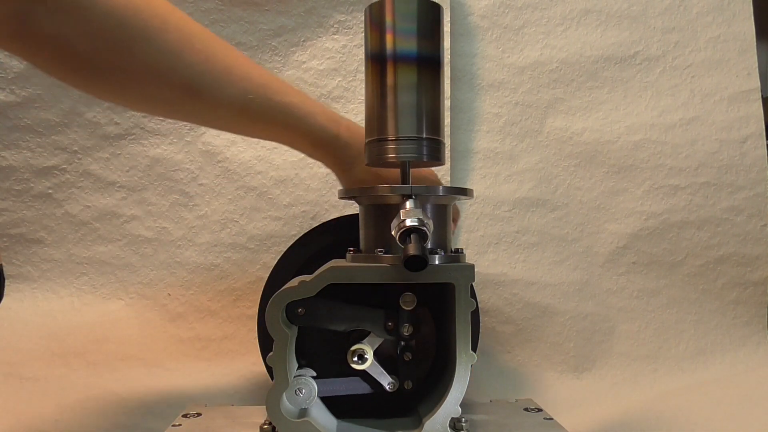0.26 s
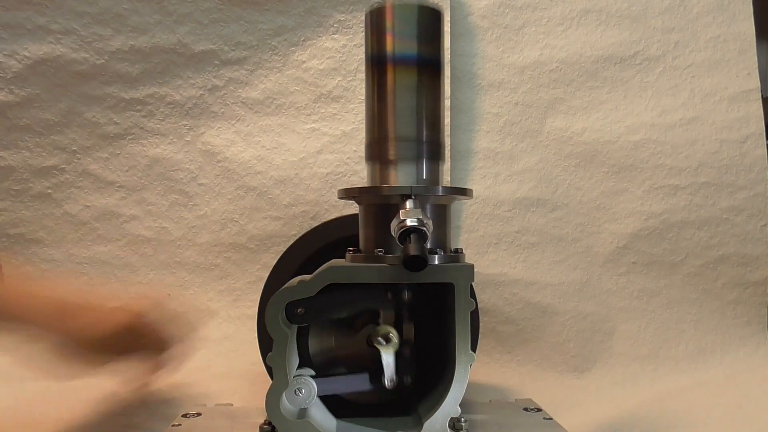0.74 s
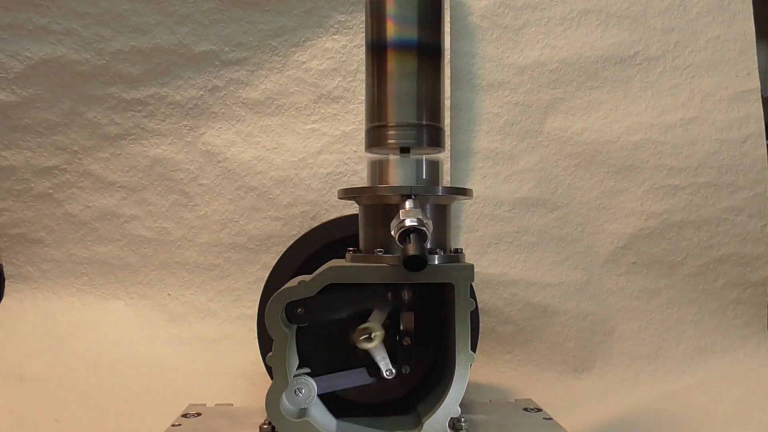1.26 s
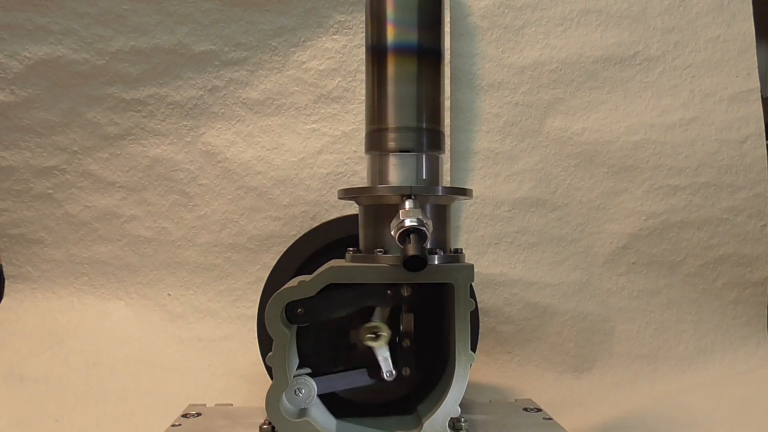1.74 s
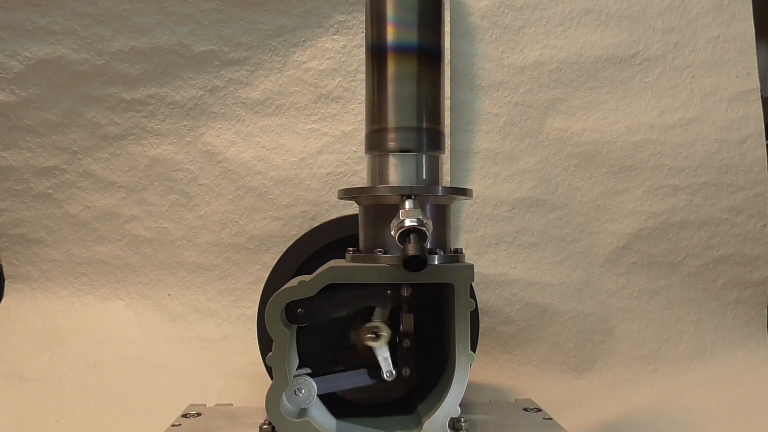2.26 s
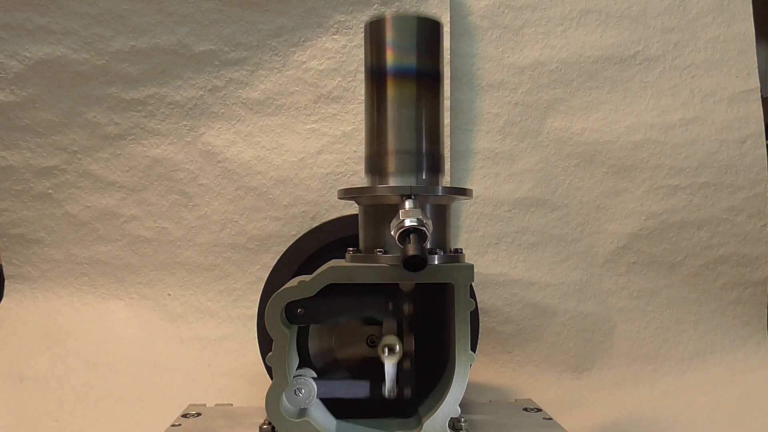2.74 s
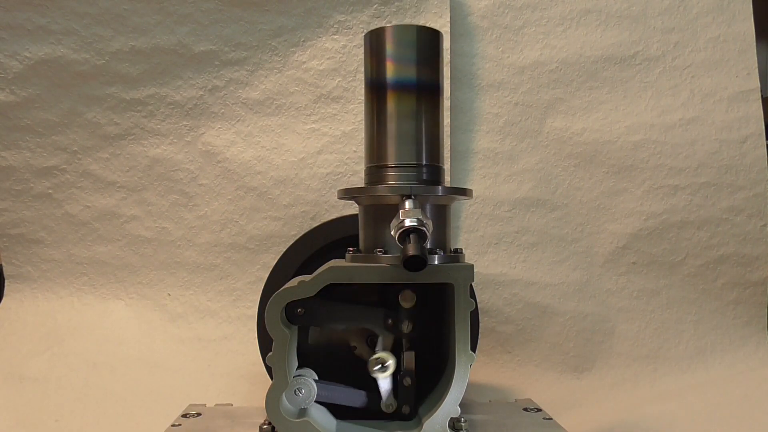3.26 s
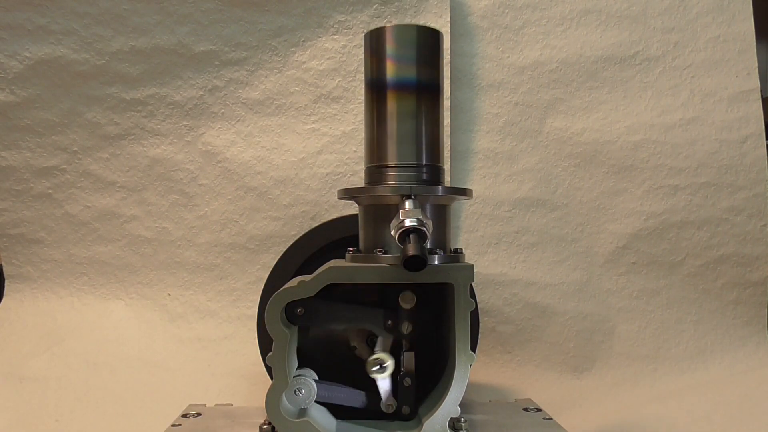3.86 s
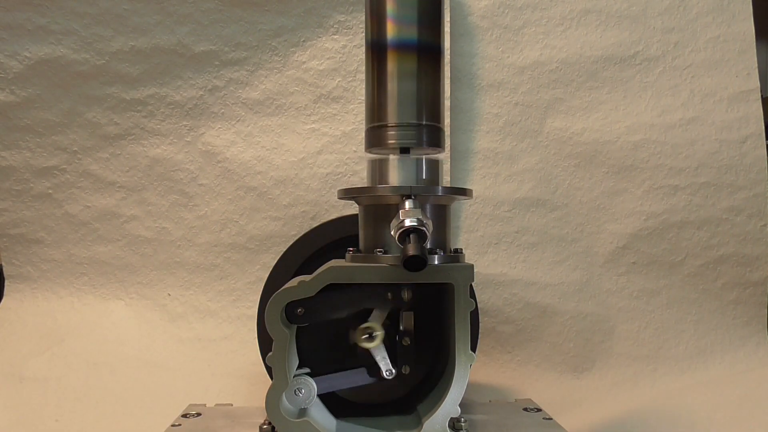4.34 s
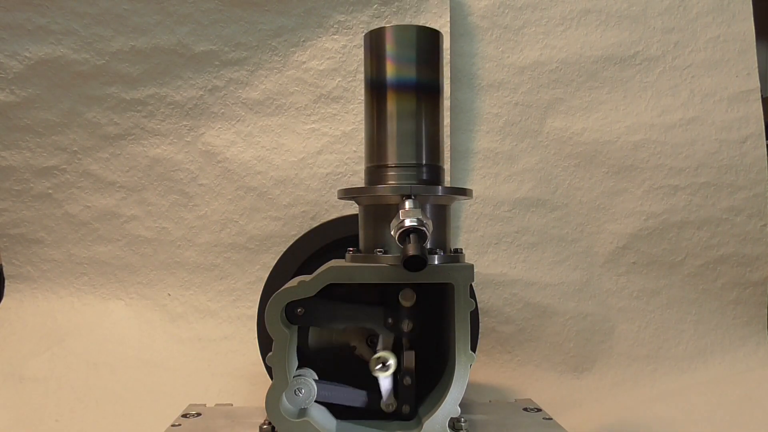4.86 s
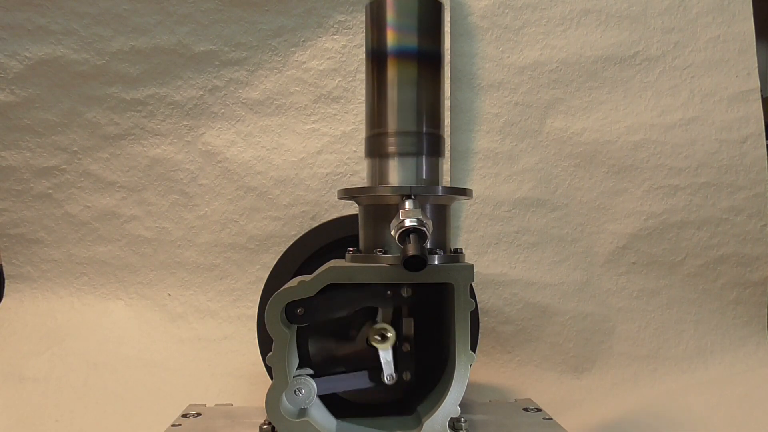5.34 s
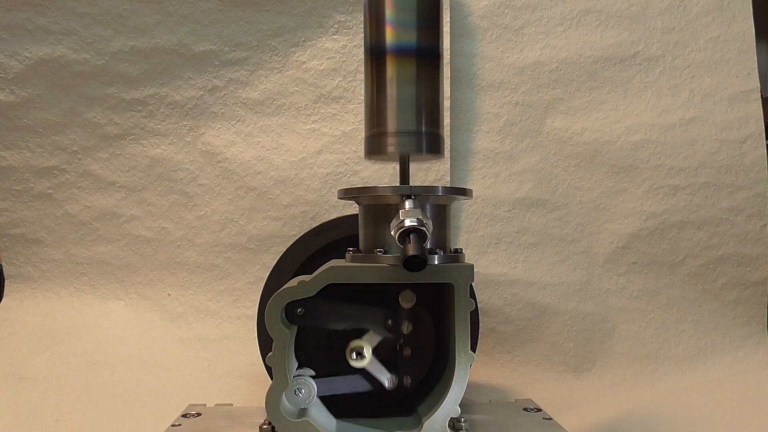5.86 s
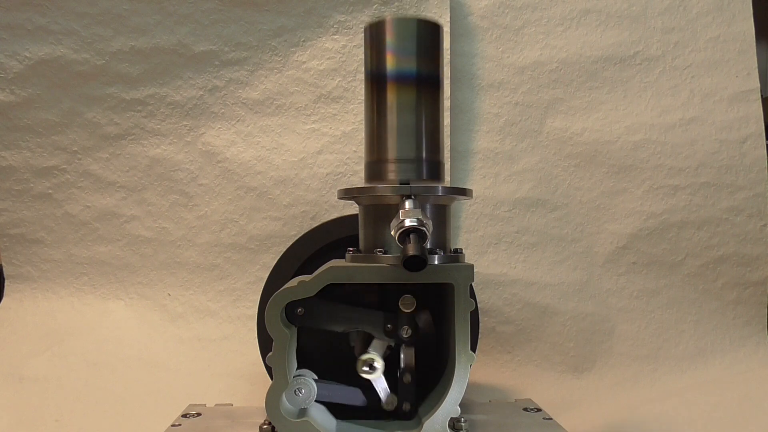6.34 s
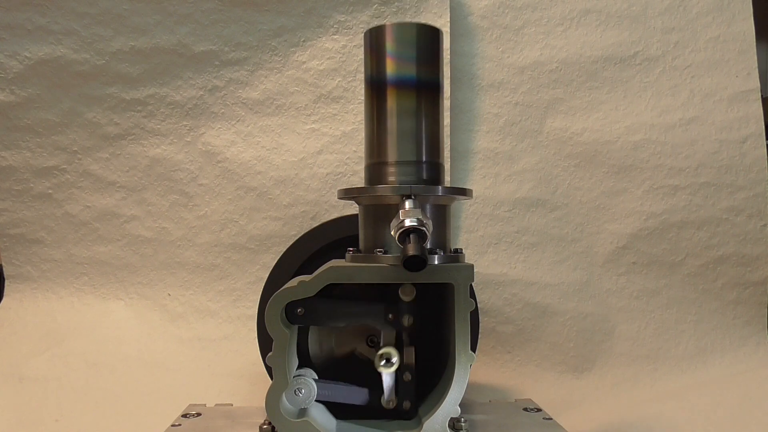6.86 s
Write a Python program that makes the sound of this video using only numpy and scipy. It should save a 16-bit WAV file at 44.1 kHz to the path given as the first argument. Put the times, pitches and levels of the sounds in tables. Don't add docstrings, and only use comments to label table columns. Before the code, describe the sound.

A dull low thump from the microphone opens the clip and drains away within 0.2 s, with a brief breath-like hiss of electronics. Until 0.7 s it is nearly quiet: soft room hiss, a thin high whine that then stops, faint fingers and flywheel murmurs. A small clack at 0.72 s precedes the flick; from 0.8 s come a hard hollow knock, a bright tick and a bump as the hand slips off, with a rush of scraping. Short, dry, woody-metallic knocks follow about every 0.24 s, loudest until 1.5 s, with link clacks near 1.4 and 1.56 s. Between them lie gritty rubbing, thin bearing singing and low bench groans. Knocks grow softer and wider apart, 0.3 s at 3.5 s and over 0.4 s near 7 s, with stray clacks around 4.4, 5.8, 6.6 and 7.06 s. A faint hum swells around 0.9 and 4.6 s. The engine is still turning when it ends.

```python
import sys
import numpy as np
from scipy import signal
from scipy.fft import rfft, irfft, next_fast_len
from scipy.io import wavfile
from scipy.ndimage import map_coordinates

SR = 44100
rng = np.random.default_rng(int(sys.argv[2]) if len(sys.argv) > 2 else 0)


def gain_from_decibels(decibels):
    exponent = np.asarray(decibels, float) / 20
    return 10 ** exponent


def pcm_store(signal):
    levels = np.round(np.clip(np.atleast_2d(signal), -1, 1) * 32767)
    wavfile.write(sys.argv[1], SR, levels.astype(np.int16).T)


N = 313551
TIME = np.arange(N) / SR
COARSE = TIME[::32]


def unit(x):
    return x / np.sqrt(np.mean(x ** 2) + 1e-20)


def filtered(x, response):
    m = next_fast_len(N + SR // 8, True)
    return irfft(rfft(x, m) * response(np.fft.rfftfreq(m, 1 / SR)), m)[:N]


def resonant(x, peaks):
    def response(f):
        total = 0
        for k, (hz, width, db) in enumerate(peaks):
            band = 1j * f * width
            total = total + (-1) ** k * gain_from_decibels(db) * band / (hz * hz - f * f + band)
        return total
    return filtered(x, response)


def resonant_noise(peaks):
    return unit(resonant(rng.standard_normal(N), peaks))


def hiss(spectrum):
    hz, db = np.transpose(spectrum)
    noise = rng.standard_normal(N)
    return unit(filtered(noise, lambda f: gain_from_decibels(np.interp(np.log(f + 1), np.log(hz + 1), db))))


def slow(rate):
    return map_coordinates(rng.standard_normal(8000), [COARSE * rate])


def wobble(rate):
    return np.interp(TIME, COARSE, slow(rate))


# t/s, peak level/dB
KNOCKS = [(0.795, -12.5), (1.028, -12), (1.267, -11.5), (1.509, -14), (1.759, -16.5), (2.014, -17.5),
          (2.275, -17), (2.543, -18), (2.817, -18.5), (3.099, -17), (3.389, -17), (3.689, -18),
          (3.996, -18.5), (4.314, -20), (4.644, -19.5), (4.988, -19), (5.346, -19.5), (5.719, -21),
          (6.112, -23), (6.526, -22.5), (6.967, -22.5)]


def turns():
    s = np.array(KNOCKS)[:, 0]
    after_last = 2 * s[-1] - s[-2]
    return np.interp(TIME, np.append(s, after_last), np.arange(len(s) + 1))


# t/s, level/dB
FRICTION = [(0, -66), (.44, -72.5), (.67, -67.5), (.79, -45), (.89, -46), (.95, -49), (1.3, -49),
            (1.9, -55), (3, -56.5), (4.4, -61.5), (6, -62), (7.11, -63)]
# slow-running level/dB, growth/(dB per dB of friction), swing/dB, loudest angle/turn
DRAG_LAYERS = [
    (-58, 0.79, 0.5, 1),
    (-67, 1.11, 3.5, .05),
    (-62.5, 1.07, 1, 0.22),
]
SLOW_DB = -62


def drag(layer):
    db, growth, swing_db, at = DRAG_LAYERS[layer]
    friction_db = np.interp(TIME, *np.transpose(FRICTION)) - SLOW_DB
    return gain_from_decibels(db + growth * friction_db + swing_db * np.cos(2 * np.pi * (turns() - at)))


# f/Hz, level/(dB per Hz)
HISS = [(18, -29), (30, -2), (81, -17), (208, -4), (237, -11), (301, -7), (713, -11), (2510, -23),
        (4120, -21), (5640, -42), (7930, -18), (12100, -36), (15700, -44)]
HISS_DB = -68
# f/Hz, rms level/dB
TONES = [
    (4037, -78),
    (8043, -79),
    (7095, -84),
]
# t/s, half length/s, level/dB
HUM = [
    (.45, 0.54, -62),
    (0.903, 0.12, -48.5),
    (4.6, 0.51, -57.5),
    (5.707, 0.19, -63),
]


def background():
    whine = sum(gain_from_decibels(db + 1.7 * wobble(25)) * np.sin(2 * np.pi * hz * TIME) for hz, db in TONES)
    whine = whine * np.clip((.72 - TIME) / 0.076, 0, 1) * np.clip(TIME / 0.44, 0, 1)
    swell = sum(gain_from_decibels(db) * np.exp(-((TIME - s) / half) ** 2) for s, half, db in HUM)
    hum = (swell + gain_from_decibels(-81.5)) * gain_from_decibels(-4 + 1.2 * wobble(4.9)) * np.sin(2 * np.pi * 237 * TIME)
    return gain_from_decibels(HISS_DB + 2) * hiss(HISS) + whine + hum


def room(x):
    t = TIME[:SR // 3]
    tail = rng.standard_normal(len(t)) * gain_from_decibels(-60 * t / 0.11) * (t > .004)
    return signal.fftconvolve(x, tail / np.linalg.norm(tail))[:N]


# f/Hz, level/(dB per Hz)
BENCH = [(18, -54), (30, -38), (81, 1.5), (119, 2.5), (163, 5), (204, 3.5), (313, 3), (368, 1), (600, 0),
         (780, -40), (1320, -120)]
# angle/turn, width/turn, level/dB
GROAN = [
    (0.33, 0.079, -44),
    (0.774, 0.08, -54),
    (0.07, 0.049, -50),
]


def bench():
    angle = turns()
    load = sum(gain_from_decibels(db) * np.exp(-.5 * ((angle % 1 - at) / width) ** 2) for at, width, db in GROAN)
    load = load * gain_from_decibels(-1.2 * TIME) * (angle > 0)
    pitch_hz = 171 + 7 * wobble(20)
    hum = load * gain_from_decibels(1.3 * wobble(9)) * np.sin(2 * np.pi * np.cumsum(pitch_hz) / SR)
    thud = 0.45 * load * resonant_noise([(92, 14, 0.82), (301.4, 14.6, -0.5)])
    rumble = drag(2) * gain_from_decibels(-1.0 + 2.2 * wobble(23)) * hiss(BENCH)
    return hum + thud + rumble


# f/Hz, width/Hz, angle/turn, half span/turn, level/dB
SINGING = [
    (5340, 81, 0.08, 0.14, -55.5),
    (9190, 120, 0.45, 0.038, -58.5),
    (5330, 150, 0.572, 0.075, -59),
    (2860, 110, 0.425, 0.087, -66),
]


def singing():
    angle, out = turns(), 0
    for hz, width, at, half, db in SINGING:
        load = np.exp(-((angle % 1 - at) / half) ** 4) * (angle > 0)
        ring = unit(resonant(gain_from_decibels(1.7 * wobble(170)) * rng.standard_normal(N), [(hz, width, 0)]))
        out = out + load * gain_from_decibels(db - 1.2 * TIME + 1.3 * wobble(3.05)) * ring
    return out


# delay/s, angle/turn, half length/s, level/dB, fade/(dB/s), case share/dB, dullness/dB
FOLLOW = [
    (.004, .01, 0.0094, -40.5, -2.36, 1.5, 3),
    (.012, .085, 0.0055, -56, 0.3, 1.5, -3.5),
    (.017, .18, .0095, -47.5, -0.58, 6.5, 3),
]
# t/s, level/dB, case share/dB
DOWN = [(1.133, -52, -6), (1.631, -54, -14), (1.891, -48, 2), (2.137, -64, -15), (2.401, -72, -21),
        (2.666, -57, -22), (2.952, -56.5, -14), (3.238, -61, -13), (3.531, -56, -5), (3.83, -54, -13),
        (4.139, -51, -7), (4.464, -52, 4.5), (4.794, -52, 3), (5.136, -52.5, -1), (5.503, -56, 1.5),
        (5.88, -60, 0), (6.323, -64, -20), (6.73, -64, -5)]
DOWN_HALF_TURNS, DOWN_DULL_DB = 0.044, -2.5
# t/s, level/dB
BACK = [(0.951, -44), (1.187, -49), (1.667, -54), (1.917, -46), (2.45, -53), (2.712, -64), (3.289, -61),
        (3.59, -58), (3.889, -51.5), (4.202, -48.5), (4.523, -46.5), (4.858, -47.5), (5.204, -47),
        (5.571, -47.5), (5.953, -48), (6.359, -49), (6.791, -49)]
BACK_HALF_TURNS, BACK_CASE_DB, BACK_DULL_DB = 0.044, 7.5, 6.5
# t/s, half length/s, level/dB, case share/dB
SCUFFS = [
    (0.838, 0.022, -32.5, -1.5),
    (.914, .0053, -44, -25),
    (1.4, 0.019, -40.5, 3.5),
    (1.719, 0.024, -46, -1),
    (1.986, 0.0075, -49.5, 9.5),
    (4.277, 0.0036, -67, 26),
]


def strokes():
    s = np.array(KNOCKS)[:, 0]
    period = np.append(np.diff(s), 1.08 * (s[-1] - s[-2]))
    scatter = rng.standard_normal((len(s), len(FOLLOW), 2)) * [1.2, 3]
    rows = []
    for j, (delay, part, half, db, fade, case_db, dull_db) in enumerate(FOLLOW):
        for k in range(1, len(s)):
            at = s[k] + delay + part * period[k]
            level_db = db + fade * s[k] + scatter[k, j, 0]
            rows.append((at, half, level_db, case_db + scatter[k, j, 1], dull_db))
    for at, db, case_db in DOWN:
        rows.append((at, DOWN_HALF_TURNS * np.interp(at, s, period), db, case_db, DOWN_DULL_DB))
    for at, db in BACK:
        rows.append((at, BACK_HALF_TURNS * np.interp(at, s, period), db, BACK_CASE_DB, BACK_DULL_DB))
    return rows + [(*row, -2) for row in SCUFFS]


CRACKLES_PER_S, CRACKLE_SIZE = 600, 2


def scrape(level, peaks, grit_db, wander_db):
    angle = np.interp(COARSE, TIME, turns())
    size = next_fast_len(N + SR // 10, True)
    f = np.fft.rfftfreq(size, 1 / SR)
    contact = level * rng.standard_normal(N)
    contact = contact * (1 + CRACKLE_SIZE * (rng.random(N) < CRACKLES_PER_S / SR))
    total = 0
    for k, (hz, width, db, at, swing_db) in enumerate(peaks):
        swing = swing_db * np.cos(2 * np.pi * (angle - at))
        drive = gain_from_decibels(db + swing + wander_db * slow(35) + grit_db * slow(220))
        band, detune = 1j * f * width, hz * hz - f * f
        mode = 6 * band ** 2 / ((detune + band) * (detune + 6 * band))
        total = total + (-1) ** k * rfft(contact * np.interp(TIME, COARSE, drive), size) * mode
    return np.sqrt(np.mean(level ** 2)) * unit(irfft(total, size)[:N])


# f/Hz, width/Hz, level/dB, loudest angle/turn (quietest if swing <
# 0), swing/dB
CASE_RUB = [(285, 65, -15.5, 0.083, 11.5), (438, 59, -7.5, 0.17, 4), (646, 196, -8.5, 0.19, 8.5),
            (718, 36, 3, 0.7, 5), (840, 51, -4, 0.26, 2.5), (1086, 114, -4, 0.27, 2.5),
            (1206, 106, -9.5, 0.13, 1.5), (1393, 53, -8, 0.068, 1.5)]
LINKS = [(1890, 135, 5.5, 0.88, 2.5), (1507, 110, 4.5, 1, -3.5), (2137, 198, 4.5, 0.98, 3.5),
         (2733, 210, 1, 0.27, 3.5), (3115, 196, 0.5, 0.62, 6.5), (3436, 88, 1.5, 0.99, 2),
         (3890, 355, 3.5, 0.58, 0), (4800, 270, 1.5, 1, -1.5), (5288, 65, 7.5, 0.3, 0.5),
         (5685, 120, 0.5, 0.083, 0.5)]
SEALS = [(7440, 3500, 1, 0.82, 0), (8140, 510, 3, 0.17, -3.5), (8800, 140, 7, 0.28, 0),
         (10070, 890, 7, 1, 6.5), (9890, 1360, 6, 0.59, 3.5), (12800, 210, -14, 0.25, 3),
         (12650, 160, -4, 0.95, 0), (14900, 220, -9, .5, -11)]
SEAL_TOP_HZ = 11700
SETTLE_DB, SETTLE_DB_PER_S = -50.5, -68


def rubbing():
    bearing, angle = drag(1), turns()
    case = 1.06 * drag(0) + gain_from_decibels(SETTLE_DB + SETTLE_DB_PER_S * TIME)
    links, seals = 0.56 * bearing, 0.51 * bearing
    reach = SR // 8
    sliding = 1 - .8 * np.exp(-(((angle + .5) % 1 - .5) / .035) ** 4)
    for s, half, db, case_db, dull_db in strokes():
        span = slice(round(s * SR) - reach, round(s * SR) + reach)
        u = (TIME[span] - s) / half + 0.49
        stroke = np.exp(-.5 * (u / np.where(u < 0, .4, 1.25)) ** 2)
        case[span] += gain_from_decibels(db + case_db - 2.5) * stroke * sliding[span]
        links[span] += gain_from_decibels(db + dull_db / 2 - 6.5) * stroke
        seals[span] += gain_from_decibels(db - dull_db / 2 - 4) * stroke
    lead = np.exp(-.5 * ((angle % 1 - .93) / (0.049 + 0.0018 * TIME)) ** 4) * gain_from_decibels(-48.0 - 1.9 * TIME)
    whisper = 0.19 * bearing * resonant_noise([(12500, 1300, 0)])
    case_rub = scrape(case + 1.2 * lead, CASE_RUB, grit_db=1.5, wander_db=1.2)
    link_rub = scrape(links + 1.1 * lead, LINKS, grit_db=3, wander_db=2.2)
    seal_rub = scrape(seals + .4 * lead, SEALS, grit_db=2.6, wander_db=2.5)
    seal_rub = filtered(seal_rub, lambda f: 1 / np.sqrt(1 + (f / SEAL_TOP_HZ) ** 6))
    return whisper + case_rub + link_rub + seal_rub


def bursts(events, t60):
    out, t = np.zeros(N + SR), TIME[:SR // 20]
    noise = rng.standard_normal((len(events), len(t)))
    for (s, db), n in zip(events, noise):
        out[round(s * SR):][:len(t)] += gain_from_decibels(db - 60 * t / t60) * n
    return out[:N]


# t/s, level/dB, upper mode level/dB
CREEP = [
    (0.04, -47.5, -1),
    (0.306, -54.5, -12.5),
    (0.334, -52, -38),
    (0.444, -60, -21),
    (0.49, -81, -5),
    (0.681, -94, -10),
    (0.708, -63, -7),
    (0.76, -63, -6),
    (0.78, -70, -10),
]
# t/s, level/dB
SLIDE = [
    (.03, -83),
    (.4, -71),
    (.58, -60.5),
    (.66, -71),
    (.8, -55),
    (.9, -100),
]
# t/s, level/dB
BUMPS = [
    (.822, -29.5),
    (0.8321, -15.5),
    (.846, -26.5),
    (.860, -32),
]
# f/Hz, width/Hz, level/dB
FLYWHEEL = [(78, 22, -8), (197.7, 12, 5), (303, 37, 3), (449, 42, 3.5), (580, 120, 5.5), (710, 104, 4),
            (1050, 16, 6), (1390, 104, -3.5)]


def hand():
    s, db, upper_db = np.transpose(CREEP)
    level_db = np.interp(TIME, s, db) - 900 * np.maximum(TIME - s[-1], 0)
    low = gain_from_decibels(level_db) * resonant_noise([(704, 19, 3.0), (778, 25, -2)])
    upper = gain_from_decibels(level_db + np.interp(TIME, s, upper_db)) * resonant_noise([(1046, 26, 0)])
    slide_db = np.interp(TIME, *np.transpose(SLIDE), left=-120, right=-120)
    slide = gain_from_decibels(slide_db) * resonant_noise([(12500, 9800, 0)])
    push = sum(gain_from_decibels(db) * np.exp(-.5 * ((TIME - s - .002) / .00015) ** 2) for s, db in BUMPS)
    bump = resonant(gain_from_decibels(16) * push + gain_from_decibels(6) * bursts(BUMPS, t60=.04), FLYWHEEL)
    return low + upper + slide + bump


# f/Hz, level/dB, t60/s, rise/s
CASE = [(1039, 3, 0.035, 0.0052), (697.5, -2.5, 0.03, 0.0031), (480.5, -22, 0.029, 0.00036),
        (1230, -28.5, 0.088, 0.00038), (566, -8.5, 0.023, 0.0021), (1813, -29, 0.027, 0.00039)]


def strike(events, life, spread_db, colour_db):
    out, t = np.zeros(N + SR), TIME[:SR // 5]
    scatter = rng.standard_normal((len(events), len(CASE)))
    for (s, db), chance in zip(events, scatter):
        for (hz, level_db, t60, rise), c in zip(CASE, chance):
            mode_db = db + level_db + spread_db * c + colour_db * np.log2(1000 / hz)
            gain = gain_from_decibels(mode_db - 60 * t / (life * t60))
            feed = (1 - np.exp(-t / rise)) ** 2
            out[round((s - .0012) * SR):][:len(t)] -= gain * feed * np.sin(2 * np.pi * hz * t)
    return out[:N]


# t/s, peak level/dB
CLACKS = [(.597, -44), (0.72, -26), (0.949, -45), (1.079, -44), (1.382, -23), (1.564, -31), (1.814, -42),
          (2.07, -49), (2.333, -43), (2.601, -39), (2.877, -46), (3.159, -42), (3.452, -50), (3.753, -44),
          (4.067, -35), (4.391, -26), (4.716, -53), (5.065, -41), (5.424, -37), (5.8, -24.5), (6.197, -34),
          (6.614, -26), (7.059, -24.5)]
# t/s, peak level/dB
TICKS = [(0.5974, -47), (0.831, -21), (0.9123, -47), (1.318, -27.5), (1.537, -41), (1.5617, -32.5),
         (1.812, -36), (2.0374, -35), (2.068, -35.5), (2.2977, -38), (2.3306, -37), (2.43, -48),
         (2.5664, -36.5), (2.599, -37), (2.8417, -35.5), (2.8742, -37), (3.1233, -42), (3.415, -36.5),
         (3.714, -42), (4.024, -39.5), (4.3426, -38), (4.6736, -43), (5.0181, -42), (5.3765, -42),
         (5.7526, -42.5), (6.1459, -42), (6.1963, -43.5), (6.563, -45), (6.618, -41), (7.0035, -45)]
TAKE_UP_TURN, TAKE_UP_DB = .875, -24


def crank():
    knock = gain_from_decibels(6) * strike(KNOCKS, life=1, spread_db=.7, colour_db=0)
    clack = gain_from_decibels(-3) * strike(CLACKS, life=0.9, spread_db=-3, colour_db=5)
    take_up = [(a + TAKE_UP_TURN * (b - a), db + TAKE_UP_DB) for (a, _), (b, db) in zip(KNOCKS, KNOCKS[1:])]
    knock = knock + strike(take_up, life=1.5, spread_db=5, colour_db=8)
    link_modes = [(1400, 420, 4.8)] + [row[:3] for row in LINKS]
    crack = gain_from_decibels(-16.0) * resonant(bursts(KNOCKS, t60=0.013), link_modes)
    pin_modes = [(2920, 3700, -11.0), (3760, 1200, 2.5), (5470, 490, -9.5), (7600, 1500, -2.5),
                 (9900, 4800, -15)]
    tick = gain_from_decibels(5.5) * resonant(bursts(TICKS, t60=0.015), pin_modes)
    ringing = filtered(knock + clack, lambda f: (1j * f / (250 + 1j * f)) ** 2)
    return ringing + crack + tick


def scene():
    blows = crank() + hand()
    mix = blows + gain_from_decibels(-13) * room(blows) + rubbing() + singing() + bench() + background()
    return mix[None]


def band_limit(x):
    return signal.sosfilt(signal.butter(12, 15820, fs=SR, output="sos"), x)


WAKE_DB, WAKE_DB_PER_S = -57.5, -120


def record(dry):
    heard = filtered(dry[0], lambda f: (1j * f / (45 + 1j * f)) ** 2)[None]
    ceiling = .473
    offset = ceiling * np.exp((.017 - TIME) / .043) * (TIME < .3)
    headroom = np.clip(TIME / .03, .3, 1) ** 2
    wake_spectrum = [(500, -22), (2000, 2), (12000, -5), (16000, -14)]
    wake = gain_from_decibels(WAKE_DB + WAKE_DB_PER_S * TIME) * hiss(wake_spectrum)
    return band_limit(wake + headroom * heard + np.minimum(offset, ceiling))


dry = scene()
out = record(dry)
pcm_store(out)
```